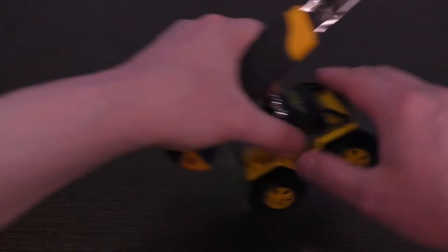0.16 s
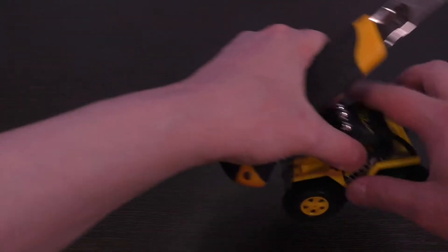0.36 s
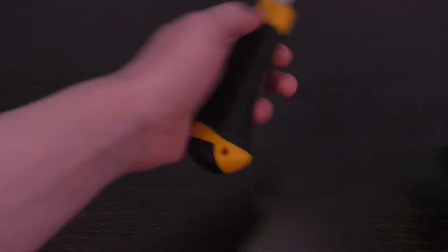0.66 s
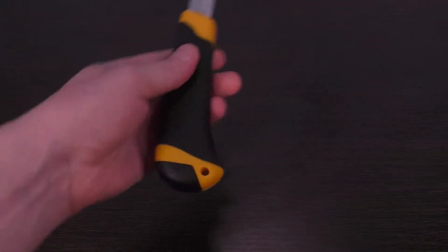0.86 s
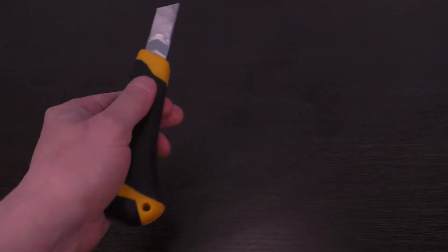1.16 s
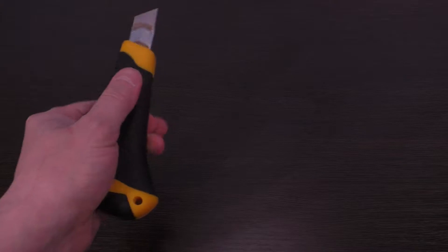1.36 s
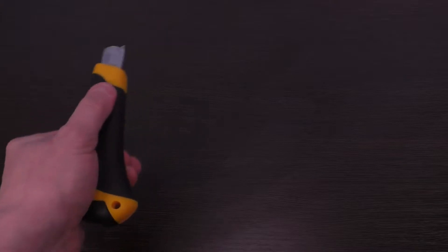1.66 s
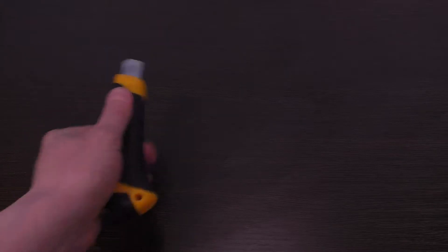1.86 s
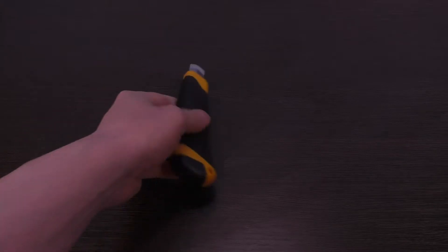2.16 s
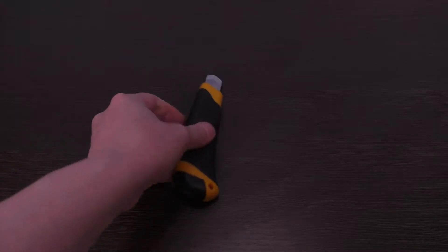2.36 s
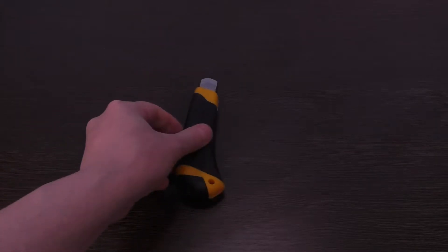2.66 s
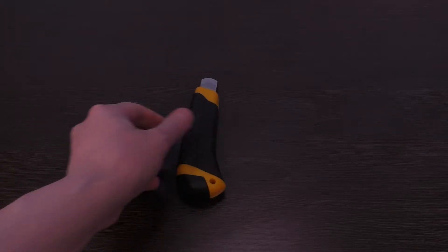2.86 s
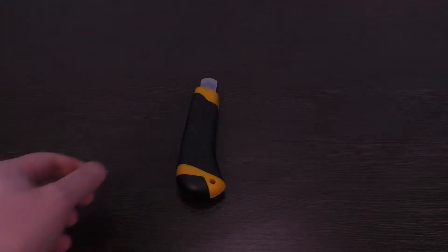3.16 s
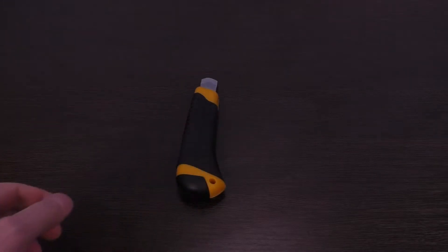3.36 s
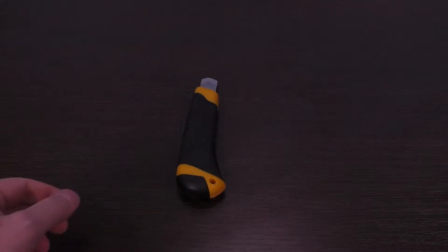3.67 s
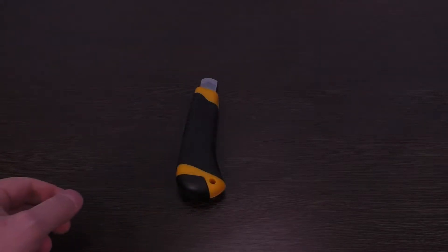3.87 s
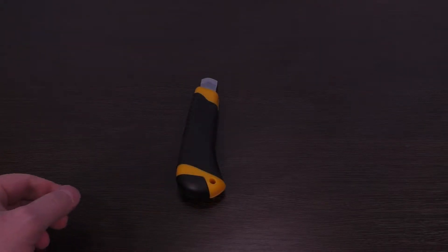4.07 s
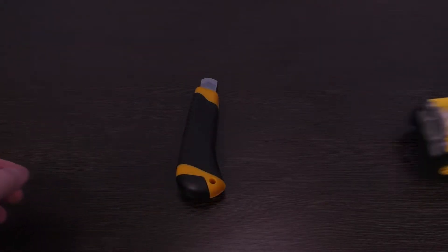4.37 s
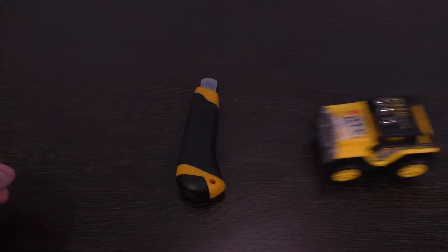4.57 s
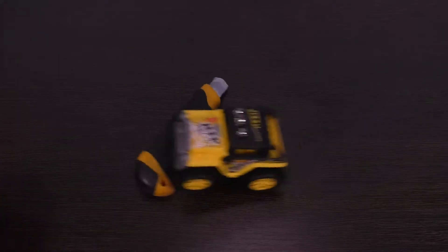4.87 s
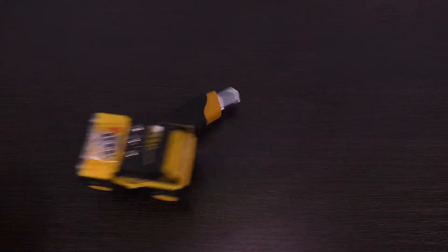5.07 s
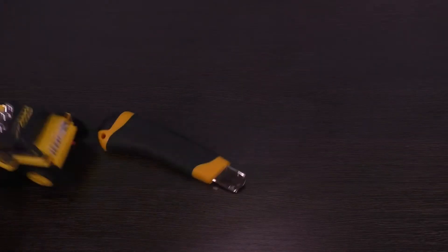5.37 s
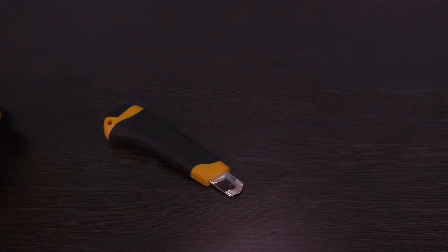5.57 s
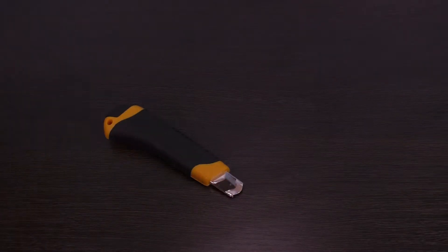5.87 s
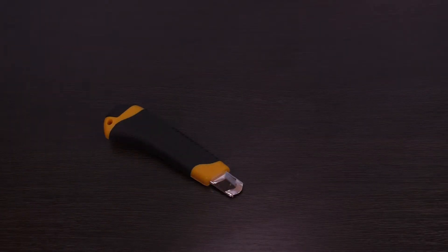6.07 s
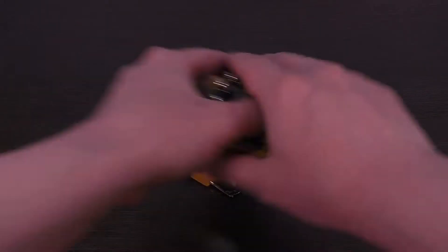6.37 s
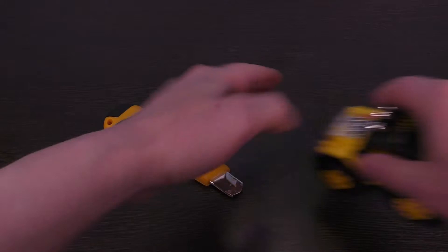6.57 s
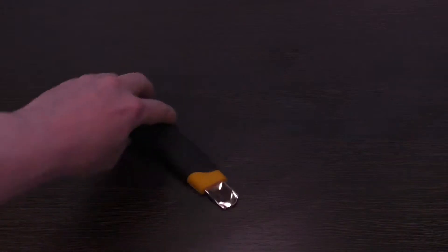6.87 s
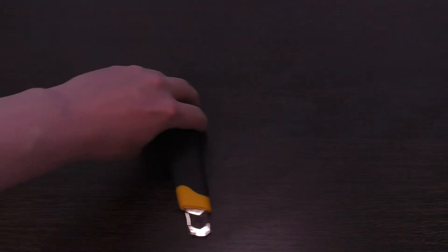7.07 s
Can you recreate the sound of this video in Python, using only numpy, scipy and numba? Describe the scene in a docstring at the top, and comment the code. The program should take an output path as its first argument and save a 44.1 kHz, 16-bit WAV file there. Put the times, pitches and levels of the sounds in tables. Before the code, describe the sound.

A toy car's buzzing gears run without pause, recorded close in stereo in a quiet room with faint hiss and low table rumble. Early hand-cupped gliding tones give way to a brisk string of bright metallic clicks and a double thud on wood. Later the car drives into a plastic-handled knife, causing a burst of hard knocks, then the whir warbles in the hands before faint final taps.

```python
"""At a wooden table, a small toy car whirs in the hands and rolls over the table top.
Its plastic gears are uneven bursts of noise coloured by the shell; hollows between car, palm and table
sing as narrow noise at a gliding pitch. A snap-blade knife is ratcheted shut, laid down and later run over:
its clicks and knocks set handle, blade and table ringing. Rumble and soft hiss lie underneath.
A gain control turns everything down after loud peaks and then lets go slowly."""
import sys
import numpy as np
from scipy import signal
from scipy.io import wavfile
from numba import njit

SR = 44100
rng = np.random.default_rng(int(sys.argv[2]) if len(sys.argv) > 2 else 0)


def wav_out(sig):
    """Save sig, one row per channel (or a flat mono array), as 16-bit PCM at SR to the path in sys.argv[1]."""
    wavfile.write(sys.argv[1], SR, np.round(np.clip(np.atleast_2d(sig).T, -1, 1) * 32767).astype(np.int16))


N = 318843

# Levels in these tables are starting points: layers may add offsets, chance and the final gain control.
# Vibration carried by the table top: time_s, rumble_db, panel_buzz_db
TABLE_RUMBLE = [(0, -73, -70.5), (.31, -74, -68), (.6, -74, -75.5), (1.2, -69, -70), (1.3, -69.5, -67.5),
                (2.07, -74, -75.5), (2.49, -75, -72.5), (2.66, -60, -66), (2.95, -70.5, -79),
                (3.2, -74, -71), (3.48, -60.5, -74), (3.8, -72, -71.5), (4.13, -65.5, -73),
                (4.4, -62, -71.5), (4.78, -66, -69), (5.12, -58, -70), (5.44, -65.5, -76),
                (5.54, -55.5, -59), (5.79, -67, -79.5), (6.1, -69.5, -76.5), (6.68, -78, -73.5),
                (6.95, -72, -71), (7.08, -65, -59.5), (7.23, -60, -60)]
# Ringing of the table: pitch_hz, level_db, time_to_fall_60_db_s
TABLE_MODES = [(126.6, -2, 0.68), (185.7, 5.5, 0.19), (289.4, 2, 0.14), (378.5, -3, 0.3), (441, 3.5, 0.23),
               (512, 6, 0.26)]
# Ringing of the plastic knife handle: pitch_hz, level_db, time_to_fall_60_db_s
HANDLE_MODES = [(800, -8, .02), (1030, -3, .05), (1310, -2, .035), (1580, -2, .025), (1900, -2, .022),
                (2450, -4, .015)]
# Knife and wheels knocking on the table:
# time_s, blow_db, bass_db, brightness_db, favoured_table_pitch_hz, favoured_handle_pitch_hz
KNOCKS = [(2.453, -23, -14, -21, 280, 1040), (2.513, -29, -14, -20, 300, 1250),
          (4.9103, -28.5, -27, -19, 450, 1650), (4.9427, -23.5, -21, -17, 296, 1600),
          (5.095, -24.5, -15, -15, 199, 1030), (5.205, -29, -14, -14, 250, 1850),
          (5.309, -34, -30, -8, 200, 2600), (5.381, -22, -15, -18, 250, 1450),
          (5.446, -29, -23, -16, 450, 1400), (5.511, -35, -8, -12, 297, 2450),
          (5.521, -31, -20, -18, 297, 1310), (5.533, -30, -25, -18, 297, 1900),
          (5.593, -25.5, -18, -20, 250, 1600), (6.853, -40, -11, -12, 230, 1700),
          (6.957, -39, -9, -12, 398, 1300), (7.088, -36.5, -16, -14, 230, 1100)]
# Rubber tyres meeting the table: time_s, blow_db
TYRE_LANDINGS = [(2.575, -55), (2.645, -69), (3.402, -59.5), (4.302, -54), (4.36, -57), (4.673, -54),
                 (5.682, -59)]
# Knife slider dropping into its notches:
# time_s, blow_db, handle_pitch_hz, handle_over_blow_db, blade_pitch_hz, air_thump_db
RATCHET_CLICKS = [(1.3524, -27, 4500, 2, 8800, -63), (1.3944, -24.5, 4700, 9, 8300, -71),
                  (1.4446, -26, 4630, 11, 11500, -93), (1.4683, -26, 4500, 10, 9000, -77),
                  (1.5458, -25, 4650, 12, 10300, -104), (1.6535, -24, 4500, 12, 8500, -48.5),
                  (1.7666, -24.5, 4100, 13, 8600, -50.5), (1.847, -23.5, 4200, 13, 11200, -62.5)]
# Ringing of the slider: pitch_hz, level_db, time_to_fall_60_db_s
SLIDER_MODES = [(3330, -3.5, 0.016), (5280, -8, 0.023), (7960, -3.5, 0.024), (8800, -7.5, 0.037),
                (9420, -4, 0.037), (11760, -6, .02), (12200, -2, 0.0057)]
# Thumb forcing the slider loose: time_s, blow_db
CREAKS = [(1.333, -35), (1.3422, -24), (1.3468, -24), (1.3496, -29)]
# Ringing of the handle under load: pitch_hz, level_db, time_to_fall_60_db_s
STRAINED_MODES = [(1470, -7.5, 0.0098), (1745, -6.5, 0.025), (2110, -8.5, 0.03), (2430, -12, 0.013)]
# Tooth-mesh whine: time_s, level_db
WHINE_LEVEL = [(0, -65), (.9, -67), (1.1, -60), (2.0, -55.5), (2.45, -53), (2.62, -48), (2.72, -64),
               (7.23, -78)]
# Tones of the whine: multiple_of_mesh_pitch, level_db
WHINE_TONES = [(1, -2), (2, -12), (4, -22)]
# Short songs of a hollow closing under the hand: start_s, length_s, first_pitch_hz, last_pitch_hz, level_db
HOLLOW_SONGS = [(.475, 0.097, 1900, 1580, -48.5), (.46, 0.084, 2620, 2600, -44.5),
                (6.36, .08, 3500, 3350, -48), (0.56, 0.099, 1500, 1010, -63), (.72, .06, 1070, 1200, -58),
                (0.641, 0.14, 3300, 3150, -48.5), (2.72, 0.31, 4100, 4180, -50),
                (2.74, 0.27, 3100, 2780, -51), (2.7, .31, 1580, 1330, -52.5),
                (3.36, 0.085, 2010, 1910, -50), (3.43, .06, 3400, 3150, -49), (3.51, .13, 2850, 2270, -47),
                (3.42, .4, 4420, 4200, -51), (3.46, .29, 1440, 1350, -56.5), (3.61, 0.079, 2300, 2700, -52),
                (4.03, 0.24, 4400, 4240, -51), (4.03, .17, 3750, 2300, -46.5),
                (4.174, 0.088, 2100, 2400, -47), (5.73, 0.091, 1800, 1900, -49.5),
                (5.84, 0.083, 1820, 1600, -53.5), (7.8, .09, 1900, 1400, -64), (4.04, .08, 5250, 4700, -52),
                (5.95, .3, 4300, 4200, -57)]
# Longer songs while the car is carried, one list each: time_s, pitch_hz, level_db
CARRIED_SONGS = [
    [(.452, 4080, -41), (.5, 3950, -52), (.55, 4040, -49), (.595, 4100, -43), (.64, 4180, -51),
     (.69, 4280, -57)],
    [(.54, 3080, -49), (.58, 2750, -45), (.62, 2600, -37), (.645, 2480, -48), (.67, 2150, -53)],
    [(6.04, 1524, -51), (6.09, 1380, -49.5), (6.14, 1300, -54.5), (6.21, 1425, -54), (6.23, 1490, -62)],
    [(6.25, 1579, -56), (6.33, 1716, -55), (6.39, 1740, -50), (6.46, 1625, -42), (6.53, 1515, -44),
     (6.6, 1430, -51)],
    [(6.38, 1580, -50), (6.45, 1483, -46), (6.52, 1400, -49.5), (6.6, 1389, -53.5), (6.7, 1450, -57)],
    [(5.88, 3204, -49.5), (6.02, 3280, -53), (6.1, 2850, -48), (6.16, 2452, -51), (6.22, 2350, -46.5),
     (6.3, 2187, -52), (6.45, 2215, -42.5), (6.6, 2193, -54)],
]
# Steady tone while the car shoves the knife: time_s, pitch_hz, level_db
PUSHING_TONE = [(4.912, 1980, -48), (4.95, 1870, -46), (5.0, 1820, -45.5), (5.06, 1900, -46),
                (5.115, 1840, -44), (5.125, 1840, -56)]
# Gear rattle as the car is turned and covered: time_s, level_db, facing_db (the 3 kHz region), treble_db
GEAR_RATTLE = [(0, -48.5, -6.5, -4.5), (.37, -44.5, -2.5, -7.5), (.44, -44, -4, -7),
               (.52, -41.5, -6, -10.5), (.61, -46.5, -2.5, -6), (.73, -39.5, -4, -11),
               (.95, -47.5, -4.5, -7.5), (1.3, -48.5, -6.5, -6.5), (1.98, -48, -9, -7.5),
               (2.2, -50.5, -8, -8.5), (2.65, -45.5, -5.5, -7), (2.77, -46, -10, -9),
               (2.96, -49, -9.5, -7.5), (3.18, -51.5, -0.5, -7), (3.41, -45.5, -4.5, -6.5),
               (3.59, -47.5, -8, -8), (3.97, -47, -2.5, -9.5), (4.1, -42, -6, -7.5), (4.23, -46.5, -3, -10),
               (4.46, -44.5, -0.5, -10.5), (4.85, -42.5, -3, -12.5), (5.02, -41, -1.5, -14.5),
               (5.2, -43, 1.5, -15.5), (5.59, -44.5, -5.5, -13), (6.0, -44.5, -1.5, -12.5),
               (6.13, -48, -1, -7.5), (6.31, -47, -1.5, -11), (6.45, -41, -2.5, -8),
               (6.67, -48, -2.5, -9.5), (6.91, -50, -6.5, -7.5), (7.23, -47.5, -8, -4)]
# Extra level of the lowest rattle region, under 1.8 kHz: time_s, level_db
LOW_RATTLE = [(0, 6.5), (.45, 1.5), (.9, 0.5), (1.3, 0), (1.9, -4), (2.4, -3), (2.65, 5.5), (3.0, 1),
              (4.3, 0.5), (4.9, -0.5), (5.9, 0.5), (6.05, -5), (6.21, -7), (6.3, -7.5), (6.6, -0.5),
              (7.23, 3)]
# Extra level of the rattle near 4 kHz: time_s, level_db
HIGH_RATTLE = [(0, 0.5), (.24, 2.5), (.3, -0.5), (.44, 0.5), (.47, 0), (.8, 1.5), (1.9, -1), (2.45, -6),
               (2.7, 4.5), (3.3, -2), (4.3, 2), (4.9, 0), (5.3, -3), (6.1, -0.5), (6.4, 0.5), (7.23, -2)]
# Broad colour of the shell: pitch_hz, level_db (per Hz)
SHELL_COLOUR = [(530, -53), (900, -21.5), (1320, -11.5), (1640, -6), (1970, -1), (2420, 1.5), (3510, -5),
                (3860, -2), (4800, -7), (5350, -7), (5820, -9), (7140, -13), (7860, -9.5), (11800, -10.5),
                (16000, -29.5)]
# Resonances of the shell: pitch_hz, width_hz, level_over_broad_colour_db
SHELL_MODES = [(1333, 76, 2.5), (2010, 102, 2), (2352, 535, 1.5), (2536, 54, 1), (4215, 440, -1),
               (4180, 460, -6.5), (5830, 390, 3), (7940, 76, 3.5), (8870, 140, 1)]
# Five shell regions whose levels move separately: low_hz, high_hz
SHELL_REGIONS = [(1150, 1800), (1800, 2500), (2500, 3500), (3600, 4800), (6000, 14000)]
# Each region against the rattle level, low to high: level_db
REGION_LEVELS = [-6.5, -7, 2, -7.5, 1.5]
# What each region gains as the facing changes, low to high: gain_db_per_facing_db
FACING_SHARES = [0.63, -1.13, 1.0, -0.44, -0.15]
# Where the car is: time_s, left_over_right_db
CAR_PLACE = [(0.0, 1.5), (1.07, -9.5), (1.51, -6), (1.85, -14), (2.07, -10.5), (2.5, -6.5), (2.78, -7),
             (4.21, -10), (4.39, -7), (5.38, 2), (6.14, 5.5), (6.68, -3.5), (6.97, -10), (7.23, -10.5)]
# Brief dips in the car's level: centre_s, width_s (centre to 1/e of the dip), change_db
CAR_DIPS = [(.8, 0.11, -8.5), (3.02, 0.06, -4), (3.85, 0.041, -5), (5.819, 0.016, -6), (6.731, 0.0095, -7),
            (6.83, 0.028, -4.5)]
# Width of the sound: pitch_hz, left_right_likeness (0 to 1), share_of_car_shift (0 to 1)
STEREO_WIDTH = [(150, 0.91, 1), (990, 0.8, 0.55), (2620, 0.71, 0.62), (5060, 0.74, 0.23),
                (7600, 0.99, 0.14), (14100, 0.8, 0.46)]

MESH_HZ = 2030
HUM_DB, HUM_FADES_S, HUM_LOSS_DB = -80, 2.1, -4.5   # the hum sinks over one second once the car is turned
GLIDE_FOLDS = 2                      # larger values settle a gliding pitch earlier
EDGE_SHARE, EDGE_DB = 0.2, -10       # share of a short song that fades at each end, and by how much
OFF_PITCH_DB = 9                     # loss per octave squared away from the favoured pitch
DEEP_SHARE = 0.34                    # dB the table's lowest mode gains per dB of rumble
FLOOR_DB, CUTOFF_HZ = -73.5, 15900


def amp(db):
    """Turn decibels into gain."""
    return 10 ** (np.asarray(db) / 20)


def rms_one(x):
    """Scale a sound to an rms (average strength) of 1."""
    return x / np.sqrt(np.mean(x ** 2) + 1e-20)


def in_time(rows):
    """Draw straight lines between the rows of a table: one curve per column, one value per sample."""
    s, *columns = np.transpose(rows)
    return [np.interp(np.arange(N) / SR, s, column) for column in columns]


def at_hz(points, hz, axis=1):
    """Read one column of a spectrum table at a pitch, on a log pitch scale."""
    points = np.array(points)
    return np.interp(np.log(hz), np.log(points[:, 0]), points[:, axis])


def drift(rate_hz):
    """Smoothed noise that wanders with a spread of 1; a higher rate wanders faster."""
    r = np.exp(-80 * np.pi * rate_hz / SR)
    noise = rng.standard_normal(N // 40 + 2002)   # one value per 40 samples
    slow = signal.lfilter([1], [1, -2 * r, r * r], noise)[2000:]   # drop the filter's start-up
    return np.interp(np.arange(N) / 40, np.arange(len(slow)), rms_one(slow))


def high_pass(x, hz, order=2):
    """Take away the sound below a pitch."""
    return signal.sosfilt(signal.butter(order, hz, "high", fs=SR, output="sos"), x)


def band(x, low_hz, high_hz):
    """Keep the sound between two pitches."""
    edges = [low_hz, min(high_hz, .45 * SR)]
    return signal.sosfilt(signal.butter(2, edges, "band", fs=SR, output="sos"), x)


def ring(clicks, hz, t60):
    """A unit click starts a sine of height about 1 that falls 60 dB in t60 seconds."""
    r = amp(-60 / (t60 * SR))
    w = 2 * np.pi * hz / SR
    return signal.lfilter([0, np.sin(w)], [1, -2 * r * np.cos(w), r * r], clicks + 1e-18)


def resonate(x, hz, width_hz):
    """A resonance lifts out one pitch, with gain 1 at its top."""
    r = np.exp(-np.pi * width_hz / SR)
    w = 2 * np.pi * hz / SR
    return signal.lfilter([(1 - r * r) / 2, 0, (r * r - 1) / 2], [1, -2 * r * np.cos(w), r * r], x)


def strike(times, levels_db):
    """Place one single-sample click at each time."""
    clicks = np.zeros(N)
    clicks[(np.asarray(times) * SR).astype(int)] = amp(levels_db)
    return clicks


def struck(times, levels_db, modes, spread_db, favoured_hz=None):
    """Every blow rings each mode by a chance amount, most near the pitch it favours."""
    chance_db = spread_db * rng.normal(0, 1, (len(times), len(modes)))
    if favoured_hz is not None:
        octaves_away = np.log2(np.outer(1 / favoured_hz, np.array(modes)[:, 0]))
        chance_db = chance_db - OFF_PITCH_DB * octaves_away ** 2
    out = np.zeros(N)
    for k, (hz, db, t60) in enumerate(modes):
        clicks = strike(times, levels_db + db + chance_db[:, k])
        out += (-1) ** k * ring(clicks, hz, t60)   # neighbours start in opposite directions
    return out


def burst(times, levels_db, t60, low_hz, high_hz):
    """Bursts of band noise that swell in about half a millisecond and die away."""
    fall = signal.lfilter([1], [1, -amp(-60 / (t60 * SR))], strike(times, levels_db))
    fall = signal.lfilter([.05], [1, -.95], fall)   # soften the start
    return fall * rms_one(band(rng.standard_normal(N), low_hz, high_hz))


def spread(mid, side, hz):
    """Mix two noises into left and right channels that are alike by the share for this pitch."""
    alike = np.clip(at_hz(STEREO_WIDTH, hz), 0, 1)
    return np.sqrt((1 + alike) / 2) * mid + np.sqrt((1 - alike) / 2) * side * [[1], [-1]]


def wavering(hz, width_hz, steady):
    """Narrow noise of rms 1 that follows a pitch curve, around a steady core."""
    r = np.exp(-np.pi * width_hz / SR)
    noise = rng.standard_normal((2, len(hz)))
    slow = rms_one(signal.lfilter([1], [1, -2 * r, r * r], noise))
    phase = 2 * np.pi * np.cumsum(hz) / SR
    return rms_one((slow[0] + steady) * np.cos(phase) + slow[1] * np.sin(phase))


def echoes(x, wet_db):
    """A few close reflections off table and walls, with different delays on each side."""
    out = np.array([x, x])
    lags = (rng.uniform(0.0036, 0.03, 12) * SR).astype(int)
    for k, lag in enumerate(lags):
        gain = amp(wet_db - 500 * lag / SR) * (-1) ** (k // 2)   # later ones are weaker
        out[k % 2, lag:] += gain * x[:-lag]
    return out


def room_hiss():
    """Soft room hiss: noise with its treble smoothed away, separate on each side."""
    hiss = signal.lfilter([1], [1, -.97], rng.standard_normal((2, N)))
    return amp(FLOOR_DB) * rms_one(hiss)


def rumble():
    """Wheel and motor shaking rings the table's modes; a separate buzz lies above."""
    low_db, buzz_db = in_time(TABLE_RUMBLE)
    shake = rng.standard_normal((2, 2, N)) * amp(2.9 * drift(12.4))
    # Constant shaking rings the modes with a shorter fall than single knocks do.
    deep, *upper = [amp(db) * ring(shake[0], hz, 0.34 * t60) for hz, db, t60 in TABLE_MODES[:3]]
    deep = deep * amp(DEEP_SHARE * (low_db - np.max(low_db)))
    low = rms_one(deep + sum(upper) + 15 * band(shake[0], 95, 280))
    buzz = rms_one(band(shake[1], 410, 2060))
    buzz_out = amp(buzz_db + 3.5) * spread(*buzz, 700) * amp([[-1.5], [1.5]])
    return amp(low_db + 2.5) * spread(*low, 150) + buzz_out


def knocks():
    """Blows ring the plastic briefly in two touches and the table longer, with a crack; tyres only thud."""
    s, db, bass_db, bright_db, table_hz, handle_hz = np.transpose(KNOCKS)
    table = struck(s + 0.00075, db + bass_db - 9, TABLE_MODES, 2.9, table_hz)
    table = table + burst(s, db + bass_db - 5, 0.13, 198, 670)
    table = table + struck(*np.transpose(TYRE_LANDINGS), TABLE_MODES[:2], spread_db=1.5)
    first_touch = struck(s, db - 7, HANDLE_MODES, 2.4, handle_hz)
    second_touch = struck(s + 0.0021, db - 14, HANDLE_MODES, 3.1, handle_hz)
    crack = burst(s, db + bright_db + 6, 0.04, 1300, 3400) + burst(s, db + bright_db, .012, 3000, 9000)
    plastic = first_touch + second_touch + crack
    table = echoes(table, wet_db=-15) * amp([[-1.5], [1.5]])
    return echoes(plastic, wet_db=-4.5) * amp([[-.4], [.4]]) + table


def ratchet():
    """Each notch snaps handle and blade into short rings, with a noisy tail and a puff of air; creaks are added."""
    s, db, handle_hz, ring_db, blade_hz, thump_db = np.transpose(RATCHET_CLICKS)
    snap = np.zeros(N)
    # Passing each ring through a resonance gives it a brief swell.
    for t, level, hz in zip(s, db + ring_db, handle_hz):
        snap += resonate(ring(strike([t], level), hz, .006), hz, 1300)
    for t, level, hz in zip(s, db + 8, blade_hz):
        snap += resonate(ring(strike([t], level), hz, .006), hz, 1500)
    slider = struck(s + .0003, db - 1, SLIDER_MODES, spread_db=3)
    tail = burst(s, db - 5, 0.014, 3300, 5600) + burst(s, db, 0.006, 7200, 12600)
    tail = tail + burst(s, db + 0.5, 0.055, 2700, 20000)
    snap = high_pass(snap + slider + tail, 2600)   # so small a part sends out no lows
    puff = ring(strike(s + .001, thump_db + 30), 260, .0065)
    creak_s, creak_db = np.transpose(CREAKS)
    return snap + puff + struck(creak_s, creak_db, STRAINED_MODES, spread_db=2.5)


def whine():
    """Meshing teeth of the fastest pinion make an unsteady tone and overtones, over a hum at a third of the pitch."""
    level_db, = in_time(WHINE_LEVEL)
    hum_db = HUM_DB + HUM_LOSS_DB * np.clip(np.arange(N) / SR - HUM_FADES_S, 0, 1)
    out = amp(hum_db) * wavering(np.full(N, MESH_HZ / 3), 8, steady=1)
    for k, tone_db in WHINE_TONES:
        out += amp(level_db + tone_db) * wavering(np.full(N, k * MESH_HZ), 25 * k, steady=0.55)
    return out


def hollows():
    """An air space that changes size picks gliding pitches out of gear noise, made here as narrow noise."""
    out, t = np.zeros(N), np.arange(N) / SR
    songs = []
    for s, length, first_hz, last_hz, db in HOLLOW_SONGS:
        on = (t >= s) & (t < s + length)
        u = (t[on] - s) / length   # progress through the song, 0 to 1
        settled = (1 - np.exp(-GLIDE_FOLDS * u)) / (1 - np.exp(-GLIDE_FOLDS))
        fade = np.maximum(0, 1 - np.minimum(u, 1 - u) / EDGE_SHARE)
        songs.append((on, first_hz + (last_hz - first_hz) * settled, db + EDGE_DB * fade))
    for rows in CARRIED_SONGS:
        s, hz, db = np.transpose(rows)
        on = (t >= s[0]) & (t < s[-1])
        songs.append((on, np.interp(t[on], s, hz), np.interp(t[on], s, db)))
    for on, hz, db in songs:
        mean_hz = np.mean(hz)
        width_hz = min(mean_hz / 13, 230)
        out[on] += amp(db) * wavering(hz, width_hz, steady=(1950 / mean_hz) ** 2)   # low songs are purer
    return out * amp(2.0 * drift(230))


def pushing():
    """A nearly clean tone while the car leans on the knife."""
    hz, db = in_time(PUSHING_TONE)
    t = np.arange(N) / SR
    on = (t > PUSHING_TONE[0][0]) & (t < PUSHING_TONE[-1][0])
    return amp(db) * on * wavering(hz, 60, steady=2.5)


def fine_ringing(x, t60, wet_db):
    """The thin shell's many small modes: a random fading response, renewed every third of a second."""
    hop = SR // 3
    out = np.zeros((2, N + 5 * hop))
    window = np.hanning(2 * hop)   # overlapping pieces fade into each other
    decay_s = np.arange(int(t60 * SR)) / SR
    padded = np.pad(x, ((0, 0), (hop, 2 * hop)))
    for i in range(0, N + hop, hop):
        response = rng.standard_normal(len(decay_s)) * amp(-60 * decay_s / t60)
        response *= amp(wet_db) / np.sqrt(np.sum(response ** 2))
        response[0] = 1   # the direct sound
        piece = signal.fftconvolve(padded[:, i:i + 2 * hop] * window, response[None], axes=1)
        out[:, i:i + piece.shape[1]] += piece
    return out[:, hop:hop + N] / np.sqrt(1 + amp(2 * wet_db))


def gears(half_db, patchy_db, tick_db):
    """Dense, uneven tooth contacts make noise, coloured by the shell's broad spectrum and resonances."""
    contacts = amp(tick_db * drift(274))   # all bands share the same uneven beat of contacts
    white = rng.standard_normal((2, 2, N)) * contacts
    edges = 850 * 2 ** np.arange(0, 4.4, .25)   # quarter-octave bands, in Hz
    parts = []
    for k, (low, high) in enumerate(zip(edges, edges[1:])):
        parts.append((np.sqrt(low * high), band(white[k % 2], low, high)))
    for k, (hz, width_hz, db) in enumerate(SHELL_MODES):
        pair = white[k % 2, ::-1]   # swap the two noises
        mode = resonate(resonate(pair, hz, width_hz), hz, width_hz)
        parts.append((hz, amp(db) * mode * [[1], [-1]]))
    parts = [(hz, x * amp(at_hz(SHELL_COLOUR, hz))) for hz, x in parts]

    # Even out the regions' own strengths before setting their levels.
    power = [sum(np.mean(x[0] ** 2) for hz, x in parts if low < hz < high) for low, high in SHELL_REGIONS]
    level_db, facing_db, treble_db = in_time(GEAR_RATTLE)
    region_db = (REGION_LEVELS - 10 * np.log10(power))[:, None]
    gains_db = level_db + np.outer(FACING_SHARES, facing_db) + region_db
    gains_db[-1] += treble_db
    gains_db[0] += in_time(LOW_RATTLE)[0]
    gains_db[3] += in_time(HIGH_RATTLE)[0]

    out = np.zeros((2, N))
    for hz, x in parts:
        # Blend the levels of the two nearest regions.
        place = np.interp(np.log(hz), np.log([1450, 2150, 2950, 4200, 7000]), range(5))
        weights = np.maximum(0, 1 - abs(place - np.arange(5)))
        shift_db = at_hz(STEREO_WIDTH, hz, axis=2) * half_db
        out += amp(weights @ gains_db + patchy_db * drift(6.6) + shift_db) * spread(*x, hz)
    return fine_ringing(high_pass(out, 1100), t60=0.07, wet_db=-6.5)


def toy_car():
    """Gears, whine and singing hollows move between left and right and share brief dips in level."""
    half_db = in_time(CAR_PLACE)[0] / 2 * np.array([[1], [-1]])
    rattle = gears(half_db, patchy_db=2.0, tick_db=2.5)
    tones = echoes(whine() + hollows() + pushing(), wet_db=-22) * amp(half_db)
    t = np.arange(N) / SR
    dips_db = sum(db * np.exp(-((t - s) / width) ** 2) for s, width, db in CAR_DIPS)
    return (rattle + tones) * amp(0.82 * drift(31.0) + dips_db)


def scene():
    """Add up car, room hiss, knife, knocks and table rumble."""
    car = toy_car()
    hiss = room_hiss()
    knife = echoes(ratchet(), wet_db=-11.0) * amp([[.4], [-.4]])
    return car + hiss + knife + knocks() + rumble()


@njit
def duck(over_db, attack, release):
    """Gain cut in dB: follows an excess quickly and lets go slowly."""
    cut, held, now = np.zeros(len(over_db)), 0., 0.
    for i in range(len(over_db)):
        held = max(over_db[i], held * release)
        now += (held - now) * attack
        cut[i] = now
    return cut


def record(dry):
    """Peaks above -29 dB turn the gain down; deep bass and the top are cut."""
    attack_s, release_s = 0.0093, 0.13
    peak_db = 20 * np.log10(abs(dry).max(0) + 1e-9)   # the louder side drives both
    over_db = np.maximum(0, peak_db + 29)
    cut_db = 0.89 * duck(over_db, 1 / (attack_s * SR), np.exp(-1 / (release_s * SR)))
    even = high_pass(dry * amp(2.0 - cut_db), 80, order=1)
    return signal.sosfilt(signal.cheby2(12, 70, CUTOFF_HZ + 500, fs=SR, output="sos"), even)


dry = scene()
out = record(dry)
wav_out(out)
```